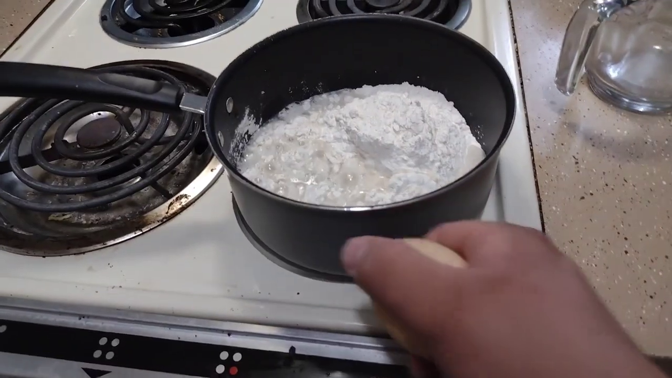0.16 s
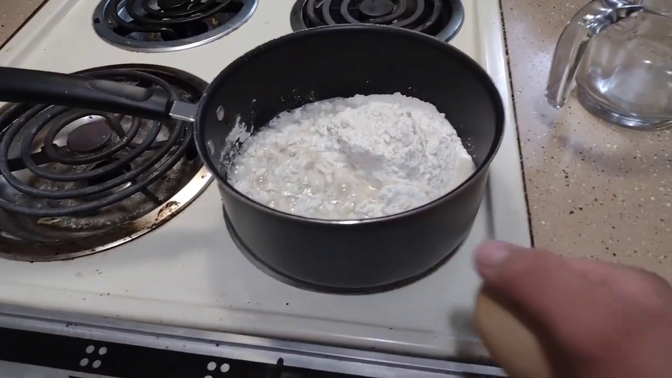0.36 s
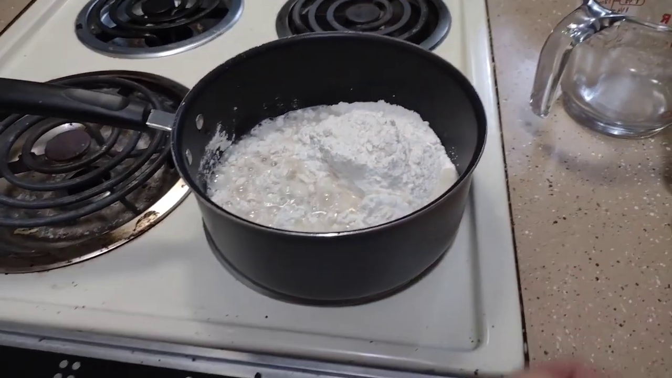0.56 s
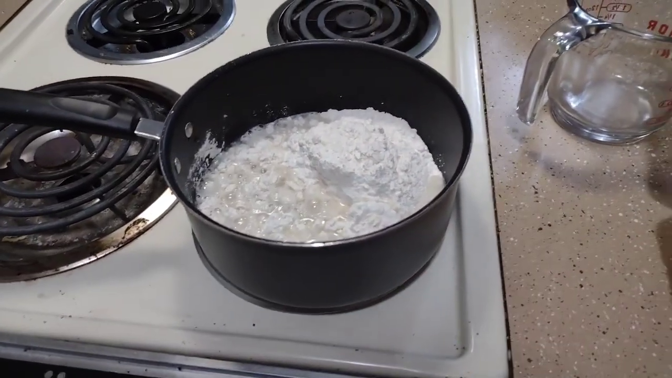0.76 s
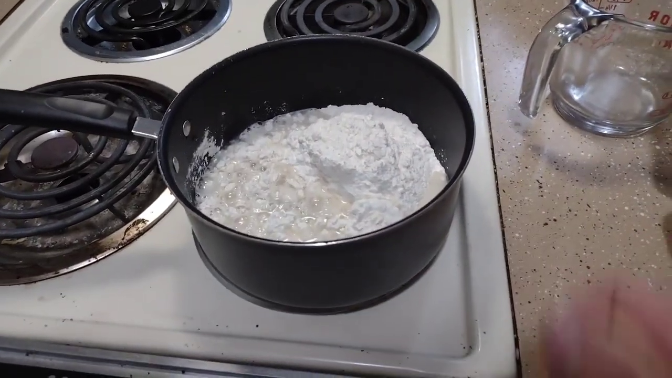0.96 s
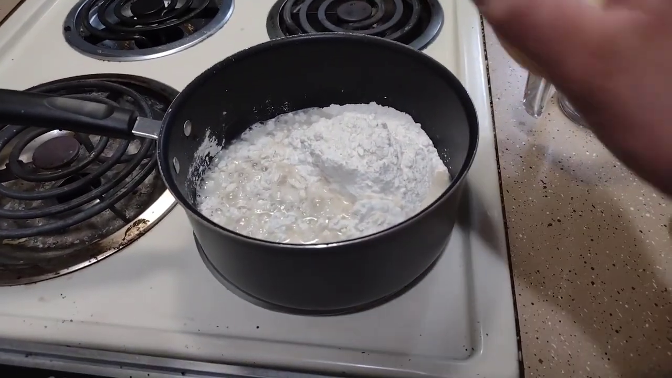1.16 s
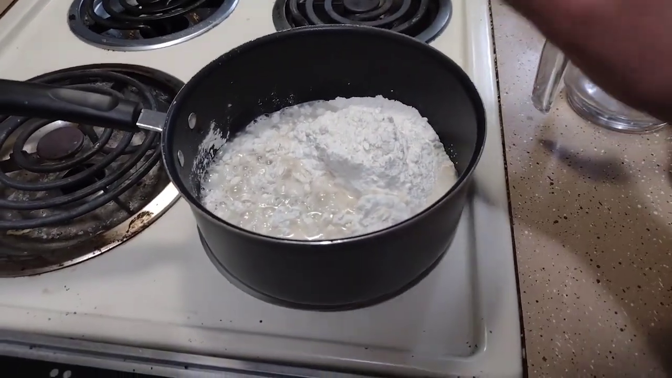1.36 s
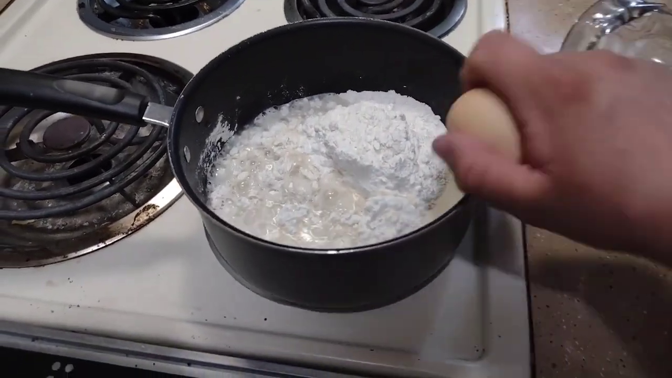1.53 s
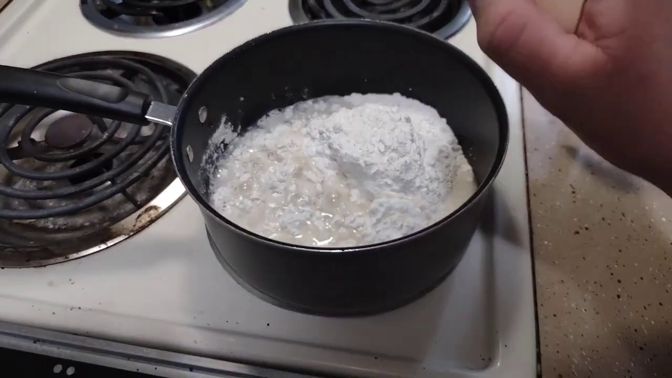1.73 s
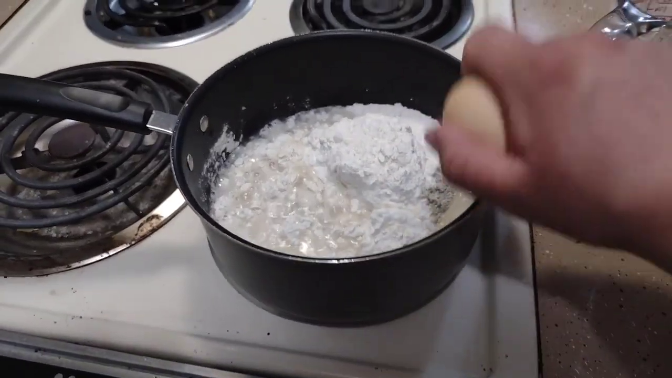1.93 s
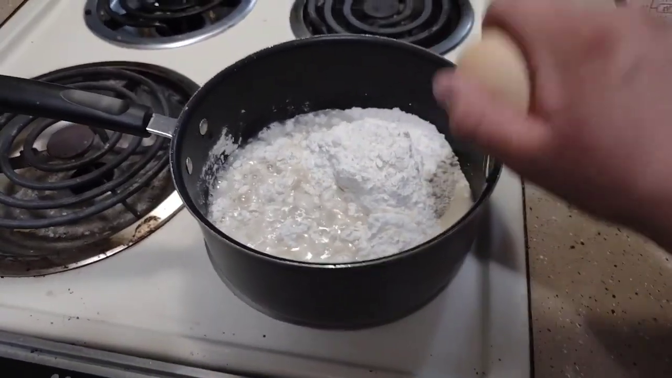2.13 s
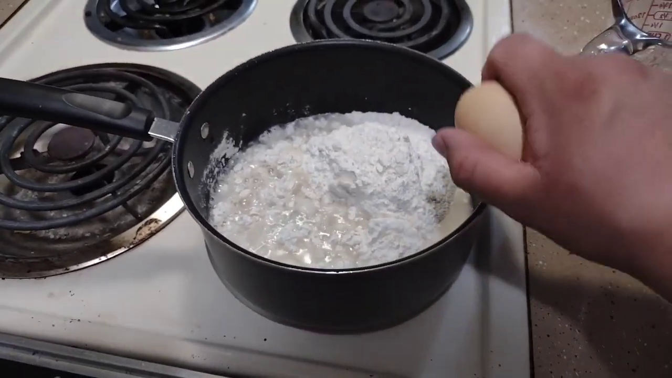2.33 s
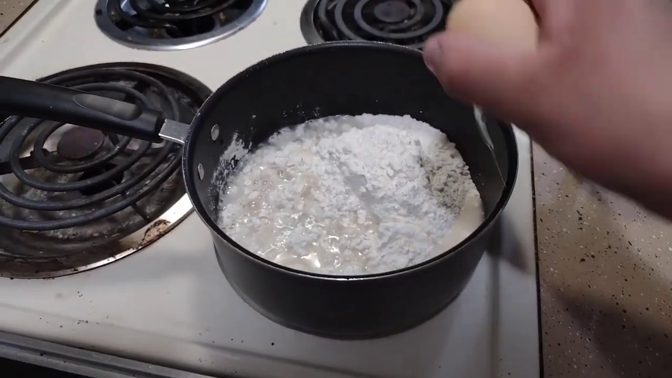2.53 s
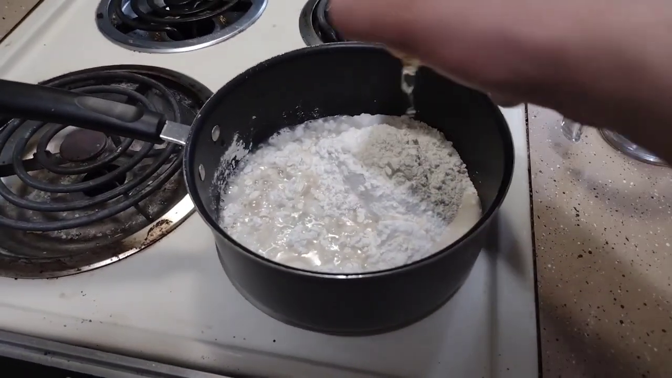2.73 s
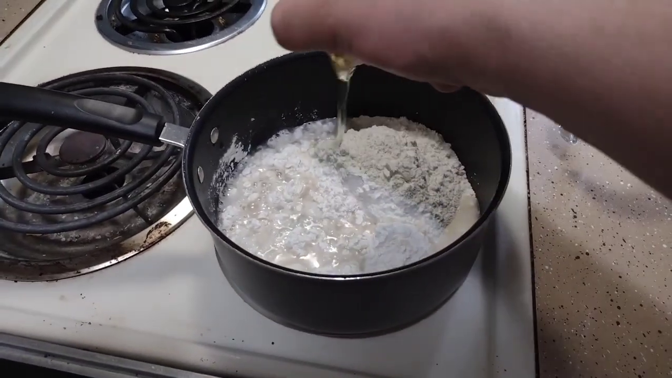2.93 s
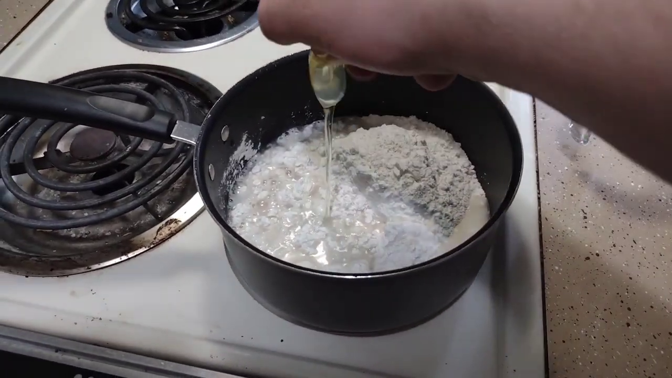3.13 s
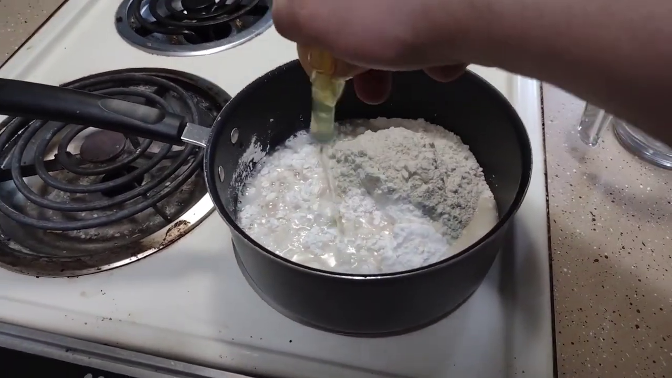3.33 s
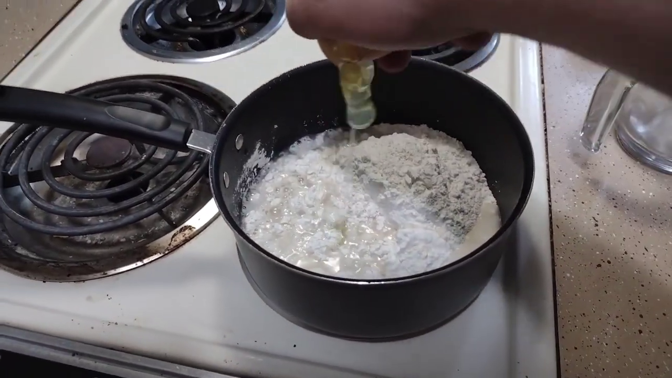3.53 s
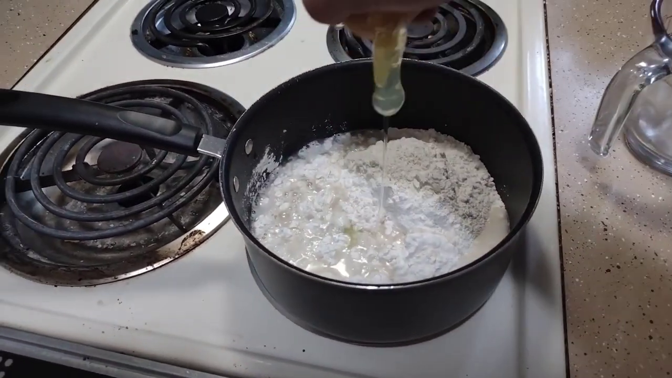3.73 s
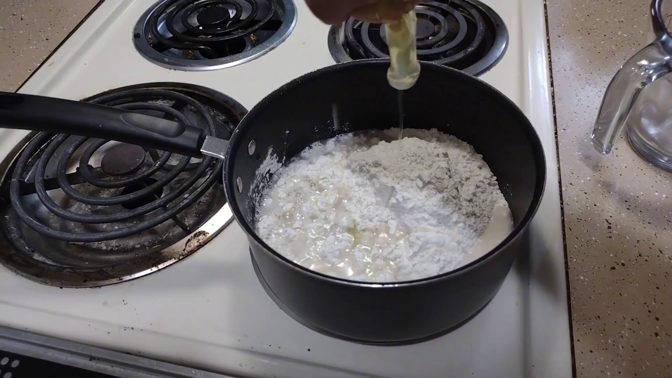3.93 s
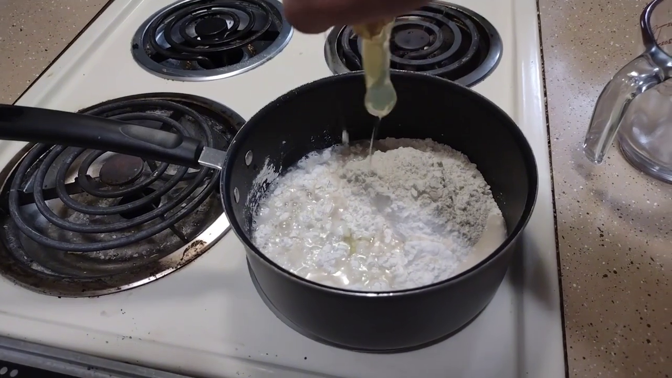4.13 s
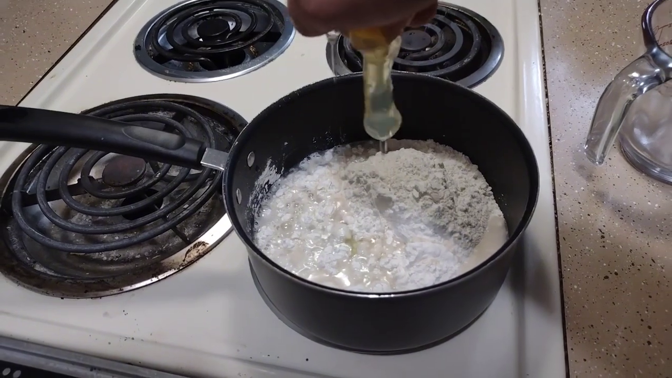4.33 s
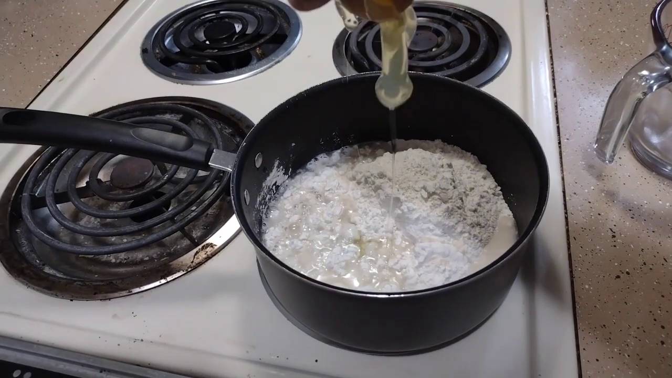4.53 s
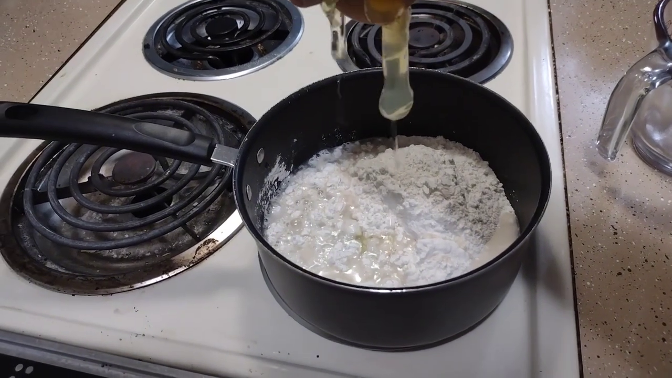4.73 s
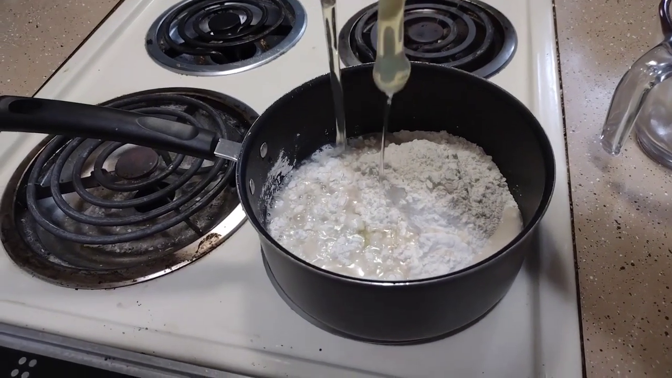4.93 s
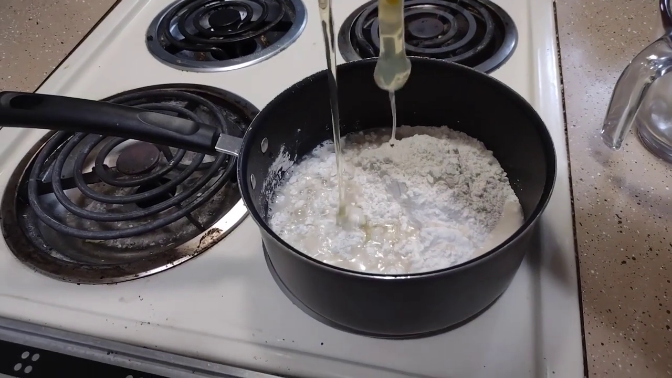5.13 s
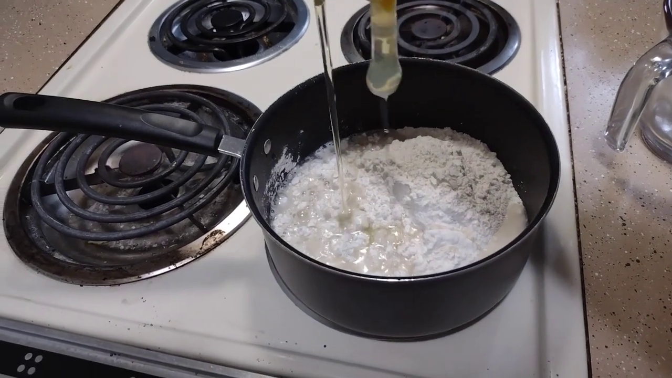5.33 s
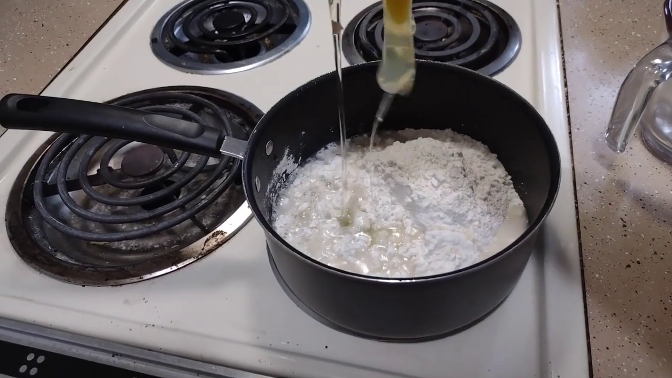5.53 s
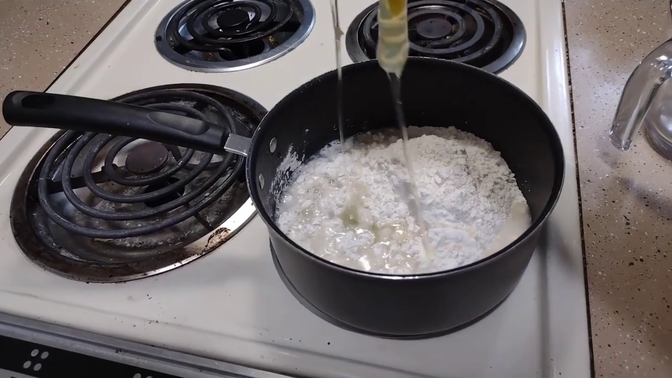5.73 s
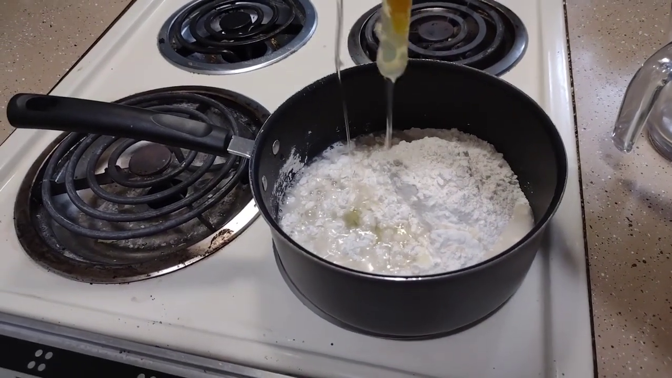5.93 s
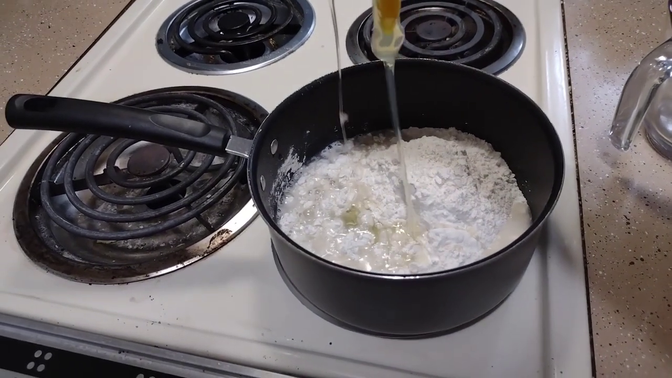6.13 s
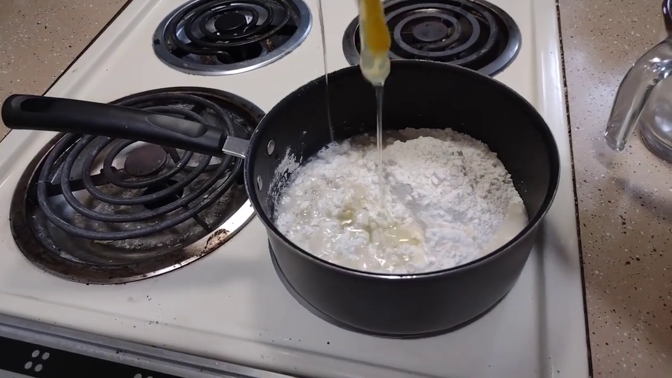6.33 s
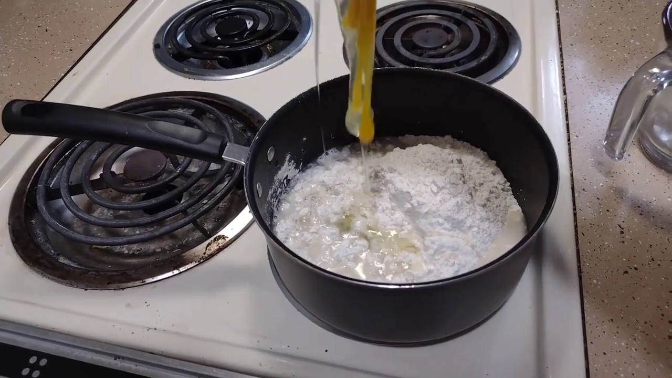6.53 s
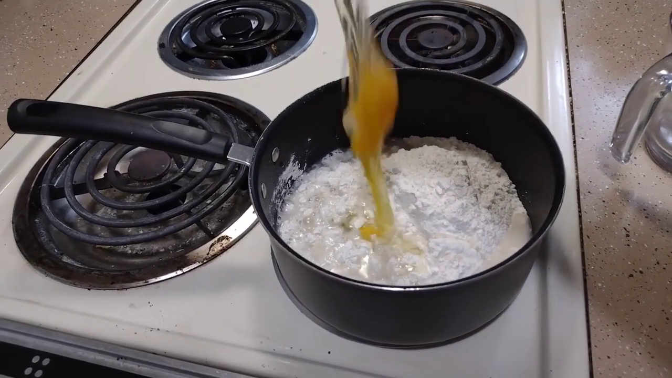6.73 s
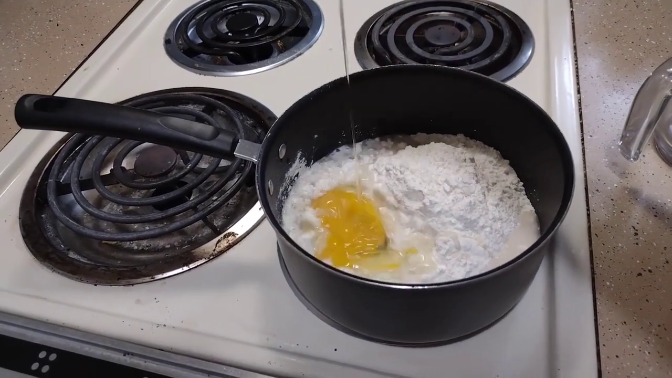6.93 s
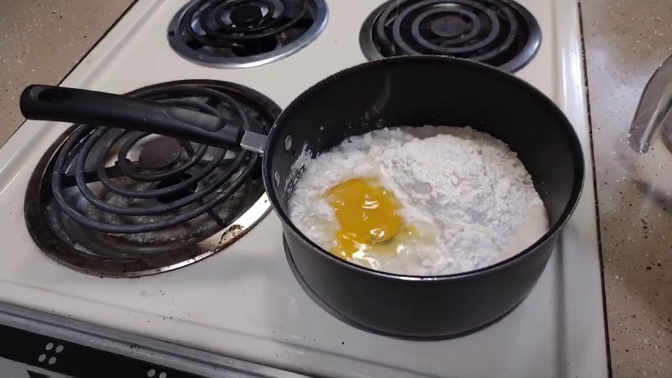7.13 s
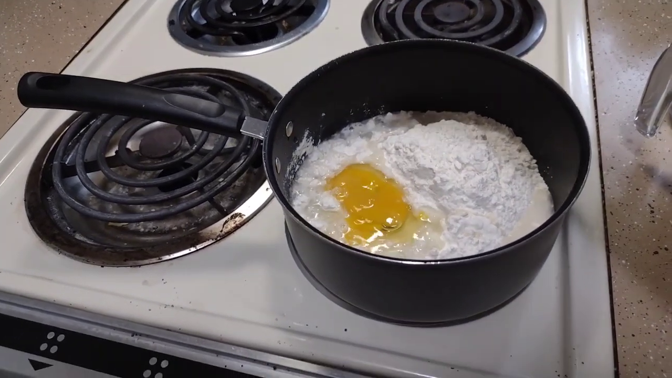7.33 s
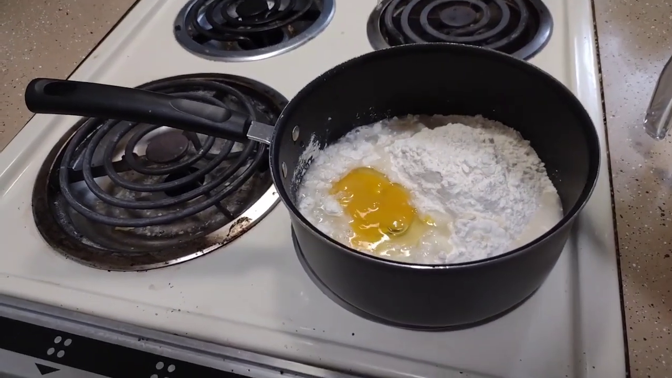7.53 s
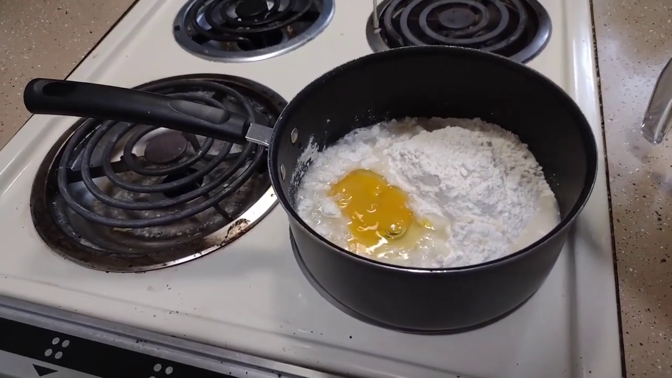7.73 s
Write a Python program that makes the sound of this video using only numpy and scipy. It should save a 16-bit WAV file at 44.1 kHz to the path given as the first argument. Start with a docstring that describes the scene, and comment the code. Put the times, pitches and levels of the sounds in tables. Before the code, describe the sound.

Three ringing knocks of egg against pan with little rattles, a crisp burst of crushing eggshell, then small scattered snaps in a quiet kitchen.

```python
"""An egg is tapped three times on a saucepan rim: noise bursts ring the pan's modes as it rocks on its stove coil.
Then fingers crush the shell, heard as single snaps and showers of tiny random impacts, close to the microphones.
The tail of a duller knock opens the scene. A hard-walled kitchen answers with decaying noise,
over the drone and mains tones of an appliance and the hiss of the stereo microphones."""
import sys
import numpy as np
from scipy import signal
from scipy.fft import rfft, irfft, next_fast_len
from scipy.io import wavfile

SR = 44100
rng = np.random.default_rng(int(sys.argv[2]) if len(sys.argv) > 2 else 0)


def field_ratio(decibels):
    """Amplitude ratio for a level in dB (20 dB per decade); scalars and array-likes work."""
    return 10 ** (np.asarray(decibels, dtype=float) / 20)


def output_pcm(signal):
    """Save a mono or channel-first signal as 16-bit PCM at the path in sys.argv[1].

    Samples are clipped to [-1, 1] before scaling.
    """
    pcm = np.clip(np.atleast_2d(signal).T, -1, 1) * 32767
    wavfile.write(sys.argv[1], SR, np.round(pcm).astype(np.int16))


N = 342602
LEAD = SR // 4  # samples of lead-in, so that sounds may start before time 0

# Egg on the rim, levels before the pan's filters: start_s, knock_db, crack_db, chatter_db, chatter_s
RIM_TAPS = [(1.594, -7, -16, -36, .11), (1.936, -16, -18.5, -31.5, 0.13), (2.273, -14.5, -25, -37, .10)]
# Pan rocking back onto the coil, level before its filters: start_s, knock_db, fall_60_db_s
COIL_ROCKS = [(1.605, -1.5, 0.011), (1.617, -21.5, 0.008), (1.64, -19, 0.019), (1.652, -21, 0.086),
              (1.689, -23, 0.035), (1.947, -8.5, .06), (1.956, -7.5, .014), (1.971, -18, 0.028),
              (1.99, -2.5, 0.013), (2.005, -24, 0.021), (2.019, -19, 0.038), (2.064, -14, 0.0088),
              (2.095, -24, .06), (2.29, -7.5, 0.011), (2.31, -25, 0.026), (2.323, -18, 0.033),
              (2.338, -16.5, .057), (2.352, -16, 0.016)]
# Modes of the saucepan: pitch_hz, width_hz, level_db
PAN_MODES = [(151, 180, -17.5), (763, 350, 2.5), (995, 11, 2.5), (1058, 51, 3), (1870, 22, -5),
             (2250, 110, 0), (3000, 13, -19), (3450, 300, -14.5), (3800, 390, -10.5), (4190, 42, -2.5),
             (4970, 120, -11), (5002, 41, -19.5), (6440, 110, -16.5), (6283, 36, -10.5), (7800, 130, -24.5),
             (7550, 25, -23)]
# Colour of a contact's body: pitch_hz, gain_db
KNOCK_COLOUR = [(240, -41), (400, -1), (884, 0.5), (1110, -9.5), (2120, 3), (2370, -0.5), (3010, -8),
                (6000, -19), (7800, -46.5), (13200, -120)]
# Shell snaps; peak before panning, treble against the peak: start_s, peak_db, ring_hz, treble_db
SHELL_SNAPS = [(1.917, -46.5, 2450, -11), (2.5323, -42.5, 1740, -15), (2.583, -46.5, 4340, -7),
               (2.933, -46, 5770, -0.5), (2.9543, -39.5, 2450, -12.5), (2.9677, -30.5, 1620, -9),
               (2.9923, -33, 3000, -6), (2.9788, -31, 3020, -16), (3.0075, -24, 4170, -11.5),
               (3.0268, -24.5, 4230, -3), (3.047, -23.5, 3000, -2), (3.0575, -20.5, 4200, -2),
               (3.0696, -21.5, 2800, 3), (3.0805, -20, 5130, 3), (3.0871, -27, 4300, 7.5),
               (3.0924, -21, 4430, 5.5), (3.1016, -26.5, 2800, 3.5), (3.1645, -36, 7520, 5.5),
               (3.2276, -12.5, 4300, -1.5), (3.273, -23, 4700, -1), (3.292, -13.5, 1800, -4.5),
               (3.299, -16.5, 1730, 6.5), (3.3045, -10, 4350, -2), (3.312, -24, 4560, -7.5),
               (3.322, -27.5, 2570, -15), (3.3324, -22.5, 4570, -6.5), (3.3464, -11.5, 4100, -6.5),
               (3.616, -34.5, 2610, -4), (3.6351, -37.5, 4450, -15.5), (3.7431, -38, 2500, -20.5),
               (3.8162, -41, 3650, -2), (3.925, -44.5, 2430, -15.5), (4.07, -45.5, 2310, -23.5),
               (4.124, -36.5, 2450, -35), (4.1301, -35, 2280, -40), (4.2414, -35, 4190, -23),
               (4.3052, -43, 2780, -7.5), (4.358, -36.5, 4240, -30), (4.5897, -49, 4330, -16),
               (4.6395, -37.5, 3660, -19.5), (4.647, -37.5, 2730, -8), (4.7653, -38.5, 4150, -25),
               (5.1067, -54, 1317, -26), (5.1876, -41.5, 4050, -10.5), (5.2552, -43, 3770, -6),
               (5.3599, -45, 2750, -8), (5.399, -41, 4000, -2.5), (5.436, -19, 3600, -12),
               (5.4526, -29, 3600, -1.5), (5.4971, -33, 4070, -20), (5.5191, -29, 4250, -26),
               (5.7424, -53, 3000, -9), (5.7822, -43.5, 2800, -8), (5.7916, -32, 3950, -12),
               (5.8526, -26.5, 2920, -10), (5.884, -30.5, 4080, -12), (5.95, -27, 3370, -13.5),
               (5.9709, -26.5, 3060, -15), (6.0623, -32.5, 3720, -22), (6.098, -41.5, 4730, -23),
               (6.2503, -37.5, 3120, -15), (6.2758, -40.5, 3080, -10), (6.3356, -44, 3180, -4.5),
               (6.344, -41.5, 5000, -3.5), (6.497, -38.5, 5400, -0.5), (6.5577, -48.5, 3280, -9),
               (6.7116, -49.5, 1100, -12), (6.8892, -34, 4640, -15), (6.9166, -37, 4030, -22),
               (7.0275, -51, 5100, -8), (7.059, -32.5, 4680, -3), (7.0808, -36, 4760, -8),
               (7.142, -51, 5020, -4)]
# Resonances of the cupped shell: pitch_hz, width_hz, level_db
SHELL_MODES = [(1760, 400, -8.5), (2450, 310, 0), (3250, 900, -1), (4250, 620, 2), (5900, 500, -6)]
# Place of the hands between the microphones: time_s, left_over_right_db
HAND_PLACE = [(2.5, -1), (3.3, 2.5), (4.3, 2.5), (4.75, 7), (5.3, -2), (5.95, -5), (6.5, -8.5), (6.9, 4),
              (7.1, 18.5)]
# Fine crackle as the fingers squeeze and pull, before its filters: time_s, level_db
CRUSH_LEVEL = [(2.45, -87.5), (2.55, -65), (2.85, -69), (2.97, -51), (3.02, -42.5), (3.1, -34),
               (3.13, -59.5), (3.22, -74), (3.25, -46.5), (3.31, -29), (3.36, -43.5), (3.42, -58.5),
               (3.9, -61.5), (4.7, -65), (4.86, -82.5), (5.1, -63.5), (5.4, -67), (5.46, -73),
               (5.74, -67.5), (5.79, -60), (5.95, -53.5), (6.1, -63), (6.52, -61.5), (6.8, -77),
               (6.93, -62.5), (7.15, -69), (7.4, -78)]
# Colour of the bright fizz: pitch_hz, gain_db
FIZZ_COLOUR = [(350, -45), (600, -12.5), (997, -15), (1510, 0.5), (3300, 2.5), (4340, 1.5), (6920, -7.5),
               (12300, -20), (16000, -16.5)]
# Contacts of the opening knock, level before its colour: start_s, level_db, fall_60_db_s
OPENING_CONTACTS = [(-.07, -6.5, 0.025), (-.02, 5.5, 0.0095), (.01, -25, 0.013), (0.052, -16.5, 0.029)]
# Colour of the opening knock: pitch_hz, gain_db
OPENING_COLOUR = [(90, -36.5), (150, -7), (280, -15), (500, -19), (900, -0.5), (1200, -8.5), (1900, -11.5),
                  (4000, -32), (9000, -46), (16000, -53)]
# Lag of the direct sound at the left microphone: pan_s, shell_s
LEFT_LAG_S = (.00013, 0.00013)
# Decay of the kitchen by 60 dB: pitch_hz, decay_s
KITCHEN_DECAY = [(150, 0.53), (500, 0.3), (2000, 0.26), (6000, 0.27), (14000, 0.22)]
# Left-right likeness of the room: pitch_hz, correlation
ROOM_LIKENESS = [(200, 0.98), (500, 0.72), (1500, 0.013), (10000, 0.25)]
# Level of the hum as heard at the microphones, lower after the taps than before: time_s, level_db
HUM_LEVEL = [(0.0, -44), (0.21, -51.5), (1.5, -53), (2.3, -58.5), (3.44, -60.5), (7.77, -60.5)]
# Colour of the drone: pitch_hz, gain_db
DRONE_COLOUR = [(15, -60), (25, -26), (36, -22), (49, -5), (85, -17), (118, -2), (144, -13), (192, -1.5),
                (299, -0.5), (499, -11.5), (595, -7.5), (849, -16), (1210, -15), (1730, -26.5), (5000, -50),
                (6500, -86), (11000, -120)]
# Tones in the hum, against its drone: pitch_hz, level_db
MAINS_TONES = [(59.2, -11), (118.4, -12)]
# Left-right likeness of the drone: pitch_hz, correlation
DRONE_LIKENESS = [(60, 0.52), (180, 0.93), (550, 0.66), (1650, -0.74), (4970, 0.91), (15000, -0.02)]
# Colour of the microphone hiss: pitch_hz, gain_db
HISS_COLOUR = [(1760, -27), (3000, -6), (3590, -10.5), (4670, -11), (14700, -15.5), (16500, -27.5)]
# Band passed by the microphones: low_hz, top_hz
MIC_BAND_HZ = (40, 15300)


def pan_contacts():
    """Lists taps and rocks as (start_s, knock_db, crack_db, fall_60_db_s); a rock dulls with time since its tap."""
    tap_life_s, rock_crack_db, dulls_db_per_s = 0.023, -26.5, 78.5
    contacts = [(s, db, crack_db, tap_life_s) for s, db, crack_db, *_ in RIM_TAPS]
    for s, db, life_s in COIL_ROCKS:
        since_tap_s = min(s - tap[0] for tap in RIM_TAPS if tap[0] < s)
        contacts.append((s, db, db + rock_crack_db - dulls_db_per_s * since_tap_s, life_s))
    return contacts


def pan_chatter():
    """After each tap the pan chatters on: many tiny impacts that sag in level, then fall away."""
    out = np.zeros((2, LEAD + N))
    for s, _, _, db, length_s in RIM_TAPS:
        end_s, end_db = s + length_s, db - 43 * length_s
        shape = [(s, db - 37.5), (s + .01, db), (end_s, end_db), (end_s + 0.17, end_db - 43.42)]
        out += field_ratio([[8], [4.5]]) * grains(shape, per_second=1300, spread_db=6.0)  # left, right gain
    return out


def pan_blows():
    """Each contact is a short noisy rattle in three colours: low thud, ringing pan body and bright crack."""
    thud_db, first_push = 5.5, 2  # thud against the knock; push against the rattle
    body_side_db, crack_side_db = 5.5, -8  # left over right
    t = np.arange(SR // 8) / SR
    thud, body, crack = np.zeros((3, 2, LEAD + N))
    for s, db, crack_db, life_s in pan_contacts():
        envelope = field_ratio(-60 * t / life_s) * (1 - np.exp(-t / 0.00063))
        burst = rng.standard_normal((5, len(t))) * envelope
        burst[[1, 3, 4], 0] = first_push  # the contact opens with one sharp push
        add(thud, s, field_ratio(db + thud_db) * burst[0], 0)
        add(body, s, field_ratio(db) * (burst[1] + 0.91 * burst[3:]), body_side_db)  # part shared, part per side
        add(crack, s, field_ratio(crack_db) * burst[2], crack_side_db)
    body += pan_chatter()

    def thud_colour(f):
        deep = resonance(f, 150, 120) ** 2 * resonance(f, 220, 620)
        return deep + field_ratio(-7.5) * resonance(f, 260, 180) ** 2

    def body_colour(f):
        modes = ringing(PAN_MODES)(f) / (1 + 1j * f / 9400) ** 2  # rolled off above 9400 Hz
        return field_ratio(along(KNOCK_COLOUR, f)) + field_ratio(3.0) * modes

    def crack_colour(f):
        return resonance(f, 5300, 7600) * resonance(f, 7000, 14000)

    return filtered(thud, thud_colour) + filtered(body, body_colour) + filtered(crack, crack_colour)


def shell_snaps():
    """A breaking edge pushes once and crumbles; the cup rings broadly, the freed piece near its own pitch."""
    crumble_s, side_scatter_db = 0.015, 5.5  # fall by 60 dB; spread around the hands
    t = np.arange(SR // 25) / SR
    out = np.zeros((2, LEAD + N))
    for s, db, hz, treble_db in SHELL_SNAPS:
        side_db = np.interp(s, *np.transpose(HAND_PLACE)) + side_scatter_db * rng.standard_normal()
        noise = rng.standard_normal((3, len(t)))
        # the fingers scatter the crumble unlike to each side
        fracture = 0.27 * (noise[0] + 0.26 * noise[1:]) * field_ratio(-60 * t / crumble_s)
        fracture[:, 0] = 1  # the sharp push

        def ring_colour(f):
            piece = resonance(f, hz, hz * 0.3) ** 2
            cup = field_ratio(-13.0) * ringing(SHELL_MODES)(f) + field_ratio(-19.5) * resonance(f, 1100, 760)
            return piece + cup

        ring = filtered(fracture, ring_colour)
        edge = filtered(fracture, lambda f: resonance(f, 7900, 12000) ** 2)
        ring *= field_ratio(db) / np.abs(ring).max()
        edge *= field_ratio(db + treble_db) / np.abs(edge).max()
        add(out, s, ring + edge, side_db)
    return out


def shell_crackle():
    """Fine fractures between the snaps sound through the cup; hard squeezing adds a bright fizz."""
    dull = filtered(grains(CRUSH_LEVEL, per_second=390, spread_db=3.0),
                    lambda f: field_ratio(4.5) * ringing(SHELL_MODES)(f) / (1 + 1j * f / 7000))
    fizz = filtered(grains(CRUSH_LEVEL, per_second=2600, spread_db=6.5), lambda f: field_ratio(along(FIZZ_COLOUR, f)))
    # the fizz gains 0.44 dB more per dB of squeeze, unchanged at -49 dB
    fizz_gain = field_ratio(0.44 * (curve(CRUSH_LEVEL) + 49))
    return dull + fizz * np.pad(fizz_gain, (LEAD, 0))


def earlier_knock():
    """A knock already under way at the opening: a few decaying noise bursts in a dull colour."""
    t = np.arange(SR // 8) / SR
    out = np.zeros((2, LEAD + N))
    for s, db, life_s in OPENING_CONTACTS:
        add(out, s, field_ratio(db - 60 * t / life_s) * rng.standard_normal(len(t)), 1.5)
    return filtered(out, lambda f: field_ratio(along(OPENING_COLOUR, f)))


def kitchen(x, piece=SR // 25):
    """Walls answer with a noise tail that dies by frequency, drawn afresh every 40 ms so no one tail repeats."""
    out = np.zeros((2, len(x) + 2 * SR))
    for start in range(0, len(x), piece):
        hz, t, z = signal.stft(rng.standard_normal((2, SR // 2)), SR, nperseg=256)
        decay = field_ratio(-60 * t / along(KITCHEN_DECAY, hz)[:, None])
        tail = signal.istft(z * decay, SR, nperseg=256)[1]
        tail /= np.linalg.norm(tail[0])
        wet = signal.fftconvolve(x[None, start:start + piece], tail, axes=1)
        out[:, start + 150:][:, :wet.shape[1]] += wet  # first return after 150 samples
    return paired(out[:, :len(x)], ROOM_LIKENESS)


def appliance_hum():
    """A fan-like drone of coloured noise with mains tones whose phase wanders."""
    t = np.arange(N) / SR
    noise = filtered(rng.standard_normal((2, N)), lambda f: field_ratio(along(DRONE_COLOUR, f)))
    hum = unit(paired(noise, DRONE_LIKENESS))
    for hz, db in MAINS_TONES:
        drift = np.cumsum(rng.standard_normal(N)) * 0.0024  # radians
        hum = hum + field_ratio(db) * np.sqrt(2) * np.sin(2 * np.pi * hz * t + drift)
    return hum * field_ratio(curve(HUM_LEVEL))


def microphone_hiss():
    """Steady coloured noise of the microphones, unrelated left and right."""
    noise = filtered(rng.standard_normal((2, N)), lambda f: field_ratio(along(HISS_COLOUR, f)))
    return field_ratio(-80.5) * unit(noise)


def grains(rows, per_second, spread_db):
    """Tiny impacts at random moments, most small and a few large, under a level curve."""
    hits = rng.random(N) < per_second / SR
    size_db = spread_db * rng.exponential(size=N).clip(0, 3)
    impacts = unit(hits * field_ratio(size_db) * rng.standard_normal(N))
    t = np.arange(N) / SR
    active = (t > rows[0][0]) & (t < rows[-1][0])
    return np.pad(impacts * field_ratio(curve(rows)) * active, (LEAD, 0)) * np.ones((2, 1))


def resonance(f, hz, width):
    """A causal resonance of gain 1 at its centre."""
    return 1j * f * width / (hz * hz - f * f + 1j * f * width)


def ringing(modes):
    """The summed response of resonances, with alternating sign."""
    return lambda f: sum((-1) ** k * field_ratio(db) * resonance(f, hz, w) for k, (hz, w, db) in enumerate(modes))


def add(out, s, sound, side_db):
    """Lays a sound into a stereo track after its lead-in; close microphones differ by 10 dB at most."""
    side = np.clip(side_db, -10, 10) * np.array([[.5], [-.5]])
    start = LEAD + round(s * SR)
    out[:, start:][:, :sound.shape[-1]] += sound * field_ratio(side)


def paired(pair, alike):
    """Two unrelated noises mixed into left and right of a given likeness."""
    def mid_side(hz):
        turn = np.arccos(np.clip(along(alike, hz), -1, 1)) / 2
        return np.array([np.cos(turn), np.sin(turn)])

    mid, side = filtered(pair, mid_side)
    return np.array([mid + side, mid - side])


def left_late(x, lag_s):
    """Sound reaches the left microphone later by the given lag."""
    return filtered(x, lambda f: np.exp(-2j * np.pi * f * np.array([[lag_s], [0]])))


def filtered(x, response):
    """x times a complex response of frequency."""
    m = next_fast_len(x.shape[-1] + min(x.shape[-1], SR // 2))
    return irfft(rfft(x, m) * response(np.fft.rfftfreq(m, 1 / SR)), m)[..., :x.shape[-1]]


def along(points, hz):
    """Values at hz between (Hz, value) points on a log axis."""
    f, v = np.transpose(points)
    return np.interp(np.log(hz + 1), np.log(f + 1), v)


def curve(rows):
    """One value per sample, held outside the rows."""
    s, v = np.transpose(rows)
    return np.interp(np.arange(N) / SR, s, v)


def unit(x):
    """Scaled to rms 1."""
    return x / np.sqrt(np.mean(x ** 2) + 1e-20)


def scene():
    """Pan and shell heard directly, their kitchen, and the hum; the shell is nearer, so it wakes less room."""
    pan = pan_blows() + earlier_knock()
    shell = shell_snaps() + shell_crackle()
    room = kitchen(field_ratio(-1.5) * pan.mean(0) + field_ratio(-7) * shell.mean(0))
    pan_lag_s, shell_lag_s = LEFT_LAG_S
    direct = left_late(pan, pan_lag_s) + left_late(shell, shell_lag_s)
    return (direct + room)[:, LEAD:] + appliance_hum()


def band_limit(x):
    """A steep low-pass at the top of the band."""
    return signal.sosfilt(signal.butter(12, 16830, fs=SR, output="sos"), x)


def record(dry):
    """The microphones add their own hiss, and a limited band of the whole passes."""
    low, top = MIC_BAND_HZ

    def band(f):
        return (1j * f / (low + 1j * f)) ** 2 / np.sqrt(1 + (f / top) ** 80)

    mix = filtered(dry + microphone_hiss(), band)
    return band_limit(mix)


dry = scene()
out = record(dry)
output_pcm(out)
```